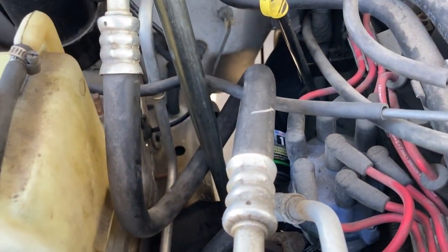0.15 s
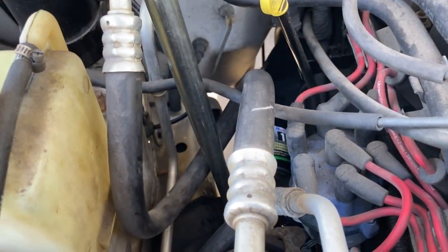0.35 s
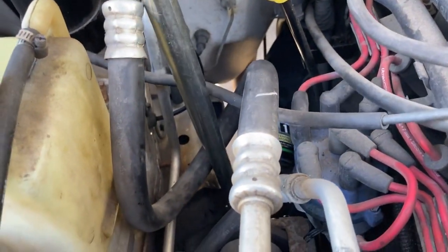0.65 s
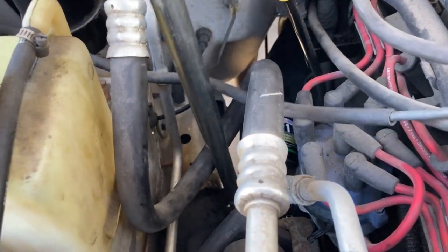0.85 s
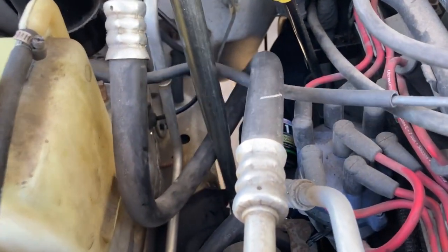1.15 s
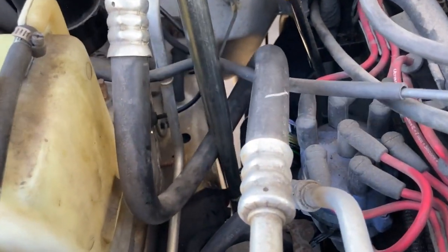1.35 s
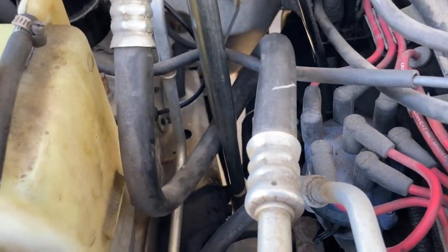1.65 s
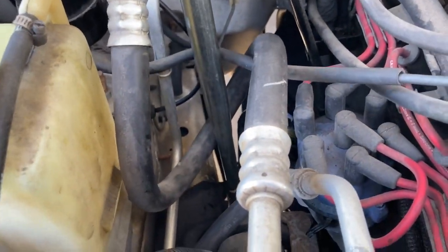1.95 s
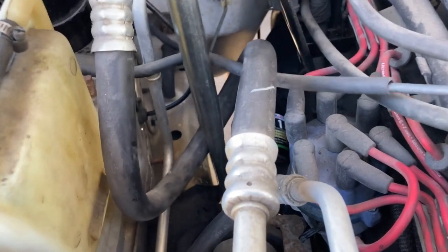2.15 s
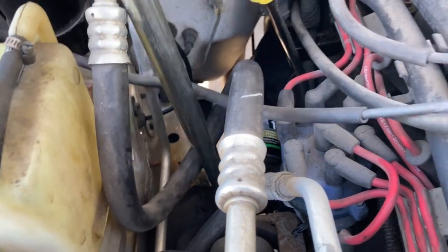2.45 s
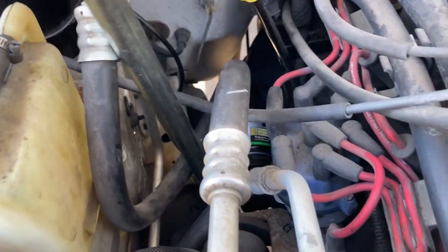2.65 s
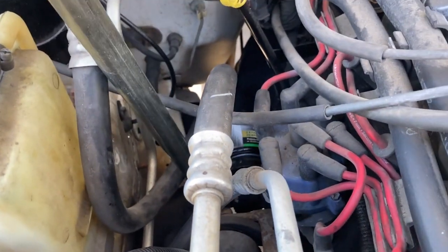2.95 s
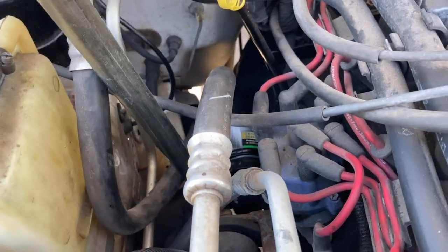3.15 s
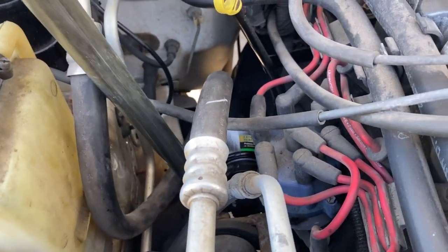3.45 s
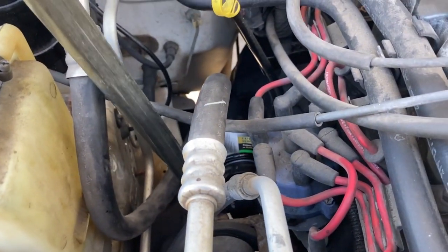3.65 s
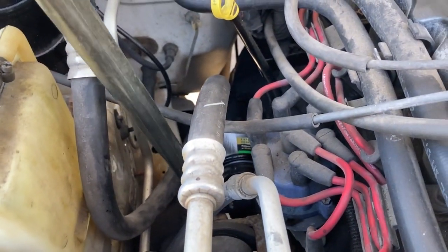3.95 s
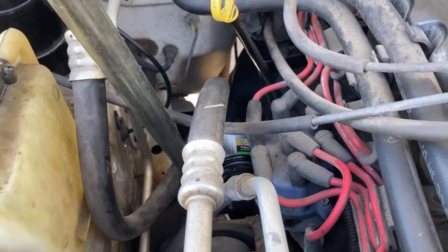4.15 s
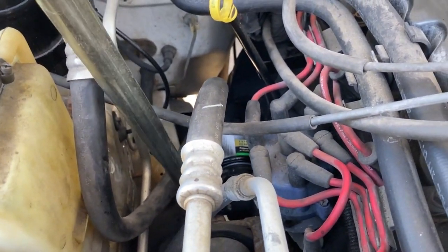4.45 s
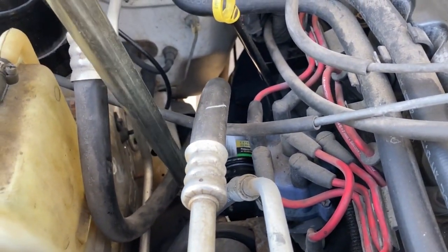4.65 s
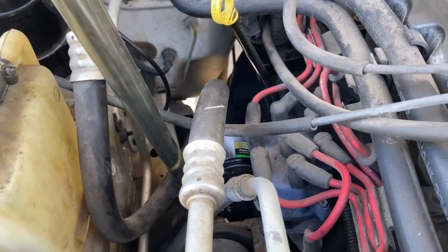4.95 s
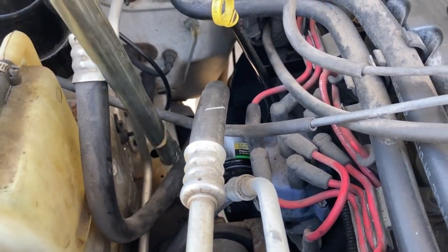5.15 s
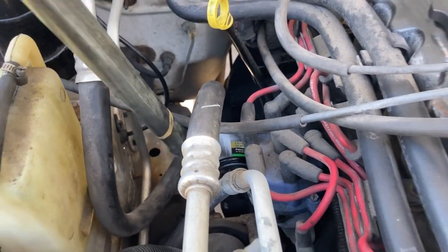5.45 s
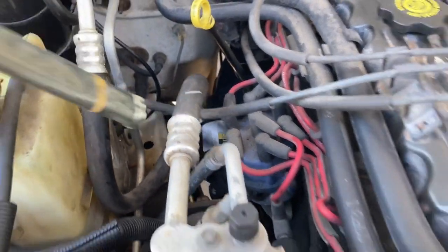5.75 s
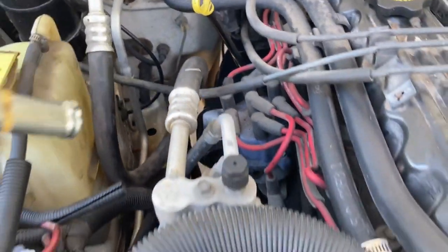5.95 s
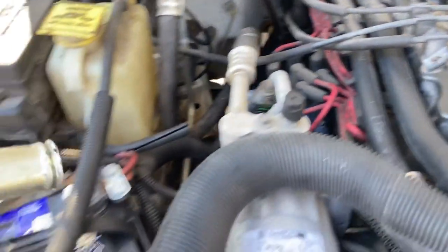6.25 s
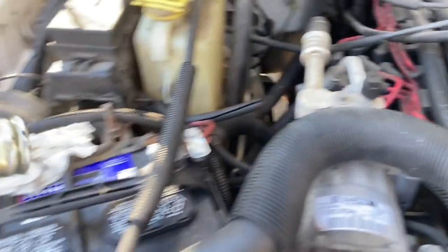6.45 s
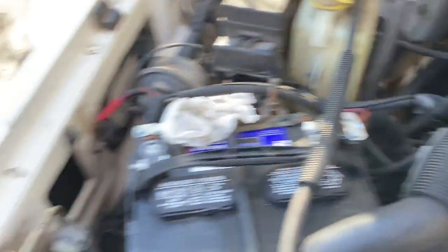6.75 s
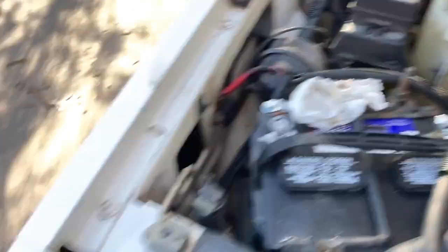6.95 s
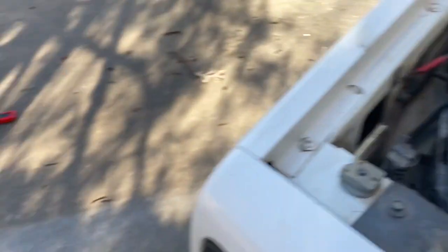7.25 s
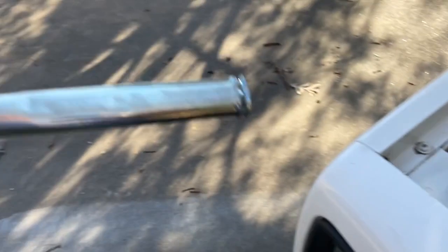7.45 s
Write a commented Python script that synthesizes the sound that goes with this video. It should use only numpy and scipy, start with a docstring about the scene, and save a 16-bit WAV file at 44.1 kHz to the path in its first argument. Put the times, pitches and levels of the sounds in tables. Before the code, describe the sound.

Close, outdoors at an open engine bay, with faint traffic, thin air hiss and uneven low wind rumble throughout. From 0.4 to 0.95 s a few small dull metal knocks sound with barely audible rubbing; then mostly wind, with a faint tick near 1.5. At 2.5 to 2.95 a quick cluster of sharp, dry clacks rattles out, running into gritty steel scraping that rises and falls through 4.3, with bumping gusts. Light clicks at 4.35 and 4.8 lead to the loudest moment: hard bright clanks at 5.1 and 5.2, with heavy short thuds, then more at 5.3 and 5.43. From 5.6 to 6.2 light ticks and a fine hissing slide set a hollow pipe ringing, high, glassy and fluttering, fading by about 7. Stronger wind thumps from 6.3 to 7.3 with faint clicks near 7.0 and 7.3, and a slight scrape at 7.5.

```python
"""Pipe extension on a wrench

A steel pipe extends a wrench deep in a car's engine bay, outdoors. The levered wrench knocks (noise bursts, struck
modes); the pipe scrapes up its handle (rubbing noise through handle modes), clanks off and rings as it is drawn out
(fluttering decaying tones). Wind buffets two microphone ports (low noise) over a faint street (steady noise)."""
import sys
import numpy as np
from scipy import signal
from scipy.fft import rfft, irfft, next_fast_len
from scipy.io import wavfile
from scipy.ndimage import uniform_filter1d

SR = 44100
rng = np.random.default_rng(int(sys.argv[2]) if len(sys.argv) > 2 else 0)


def transcribe(signal):
    """Save signal, clipped to [-1, 1], as a 16-bit WAV file at the path in sys.argv[1]."""
    frames = np.atleast_2d(signal).T
    limited = np.clip(frames, -1, 1)
    pcm = np.round(limited * 32767).astype(np.int16)
    wavfile.write(sys.argv[1], SR, pcm)


N = 335153

# Levels are in decibels; some functions add a fixed offset.
# street: start_s, traffic_db, air_db
STREET_LEVELS = [(0, -53.5, -71), (1.2, -52.5, -70), (2.3, -53, -68), (3.3, -56.5, -65), (5.0, -58.5, -68),
                 (6.2, -57.5, -66.5), (6.7, -62.5, -62), (7.6, -56.5, -59.5)]
# traffic and air spectra: freq_hz, density_db
TRAFFIC_COLOUR = [(88, -31), (150, 4), (230, -7), (409, -3), (482, -4.5), (617, -16.5), (945, -17),
                  (1070, -17), (2010, -32.5), (4000, -53), (5200, -71), (8800, -120)]
AIR_COLOUR = [(900, 2), (1300, 9.5), (1700, 1.5), (3300, 4), (5500, -5.5), (7500, -4), (10800, -8),
              (12000, -35), (15500, -22)]
# breeze that never quite drops: start_s, level_db
BREEZE_LEVELS = [(0, -49), (.7, -44.5), (.92, -37.5), (1.2, -45.5), (1.8, -38.5), (2.1, -46), (2.9, -42),
                 (4.4, -41.5), (4.85, -45.5), (5.4, -41.5), (5.75, -46), (6.2, -40.5), (6.5, -38),
                 (6.8, -36), (7.2, -34.5), (7.6, -50)]
# gusts on the ports: start_s, length_s, rumble_db, buffet_db, left_right_db
WIND_GUSTS = [(0.204, 0.065, -38.5, -71, 5), (1.361, 0.073, -28, -38, 7), (1.755, 0.092, -37, -38.5, -5),
              (2.178, 0.022, -36, -71, 13), (2.676, 0.053, -31, -39, -2.5), (2.796, 0.046, -30.5, -57, 1),
              (2.942, 0.038, -32.5, -39, 9), (3.013, 0.022, -21, -35, 5), (3.322, 0.048, -37.5, -49, 1),
              (3.426, 0.043, -29, -31.5, 1), (3.531, 0.033, -25.5, -46, 5), (3.633, 0.043, -32, -64, 9),
              (3.819, 0.083, -32, -44.5, 1.5), (3.962, 0.024, -22.5, -39, 6),
              (4.139, 0.047, -33, -34.5, 4.5), (4.474, 0.021, -42, -27.5, -4), (4.519, 0.049, -32, -34, -5),
              (4.656, 0.078, -37, -45.5, 0), (4.924, 0.021, -25.5, -33.5, -3), (4.985, 0.023, -31, -39, 8),
              (5.119, 0.029, -33, -32.5, -13.5), (5.2, 0.017, -31, -56, -11),
              (5.461, 0.033, -26.5, -32, -10.5), (6.302, 0.075, -30, -32.5, -1),
              (6.383, 0.088, -24.5, -36.5, 0), (6.453, 0.089, -26.5, -34.5, 0),
              (6.56, 0.036, -30, -44.5, 9), (6.663, 0.037, -34, -33, 0.5), (6.89, 0.063, -41, -44.5, 2),
              (6.986, 0.021, -20, -23.5, -0.5), (7.143, 0.024, -33, -29.5, 5), (7.239, 0.12, -36, -40, 1.5)]
# rumble and sharp buffet spectra: freq_hz, density_db
RUMBLE_COLOUR = [(20, -24), (35, -8), (52, 5), (75, 5), (120, -1.5), (180, -12.5), (300, -23.5), (600, -72)]
SHARP_BUFFET_COLOUR = [(25, -13.5), (60, -8), (130, -0.5), (220, -3), (350, -18.5), (600, -32.5),
                       (1200, -68)]
# left port against right: freq_hz, left_lead_rad
PORT_LEADS = [(20, 5), (300, -1.0), (600, -3), (1000, -1), (1450, -3), (1700, -2.24), (2150, -1.24),
              (3000, -2), (4200, -2), (5150, -3), (5950, -2.5), (8500, -0.5), (10000, 1.5), (13000, 4.5),
              (15000, -3.5)]
# likeness of near noise at the two ports: freq_hz, correlation_0_to_1
PORT_LIKENESS = [(100, 0.34), (400, 0.79), (1200, 0.79), (2100, 1), (4000, 0.97), (9000, 1), (15000, 1)]
# pipe strokes along the handle: start_s, length_s, rasp_db, hiss_db, growth_db
PIPE_STROKES = [(0.395, 0.39, -81.5, -79.5, -4), (0.994, 0.077, -77.5, -75, 1),
                (2.243, 0.13, -88, -70.5, -7), (2.461, 0.16, -67.5, -68, -3), (2.695, 0.052, -58.5, -68, 4),
                (2.762, 0.057, -61, -59, 0.5), (2.826, 0.068, -66.5, -52.5, -5),
                (2.969, 0.22, -75.5, -60.5, 10), (3.454, .19, -56, -63, 2.5),
                (3.654, 0.28, -57.5, -60.5, 9.5), (3.863, .19, -58.5, -59.5, 0),
                (4.306, 0.057, -59.5, -84, 9), (4.584, 0.22, -69, -67.5, 15.5),
                (4.8, 0.13, -57.5, -56.5, 3), (5.067, 0.07, -55, -74, 3.5),
                (5.213, 0.047, -56.5, -56.5, -1.5), (5.282, 0.029, -51, -63, 2.5),
                (5.615, 0.11, -64, -59, -16.5), (5.784, 0.44, -76.5, -56.5, 0.5),
                (6.187, 0.23, -68, -68.5, 7), (7.529, 0.035, -66.5, -70, -2)]
# sliding spectra: freq_hz, density_db
RASP_COLOUR = [(500, -25), (950, -23.5), (1150, -12), (2300, -18), (3300, -21), (4300, -13.5),
               (5500, -28.5), (9000, -40.5)]
HISS_COLOUR = [(4500, -16.5), (7000, -11.5), (10200, -3.5), (11200, -10), (12000, -15), (13200, -9),
               (15800, -19.5)]
# where the pipe's rim bears on the handle: start_s, place_0_to_1
RIM_PLACES = [(2.5, 0.71), (3.45, 0.03), (4.08, 0.47), (4.3, 0.7), (4.9, 1)]
# handle resonances: freq_hz, width_hz, level_db, best_place_0_to_1, loss_away_db
HANDLE_RESONANCES = [(1140, 95, -7.5, 0.79, 4), (1480, 210, -0.5, 0.78, 20), (1813, 97, 0.5, 0.89, 9.5),
                     (1990, 33, -4, 0.11, 10), (2702, 54, 2.5, 0.26, 3.8), (2958, 49, 1.5, 0.24, 3.6),
                     (3320, 45, 1, .37, 10), (3760, 160, 2, 0.68, 6.2), (3906, 150, -5, .35, 4),
                     (4220, 120, -9, .52, 11), (4880, 370, -8, 1, 9.2), (5040, 58, -1.5, .32, 14),
                     (5620, 81, -13, 0.33, 7), (6300, 67, -10, .35, 19), (7860, 120, -16.5, .7, 3)]
# wrench and pipe knocks: start_s, tick_db, thud_db, clang_db, clack_db
METAL_KNOCKS = [(0.394, -52, -50, -58.5, -78), (0.5053, -37, -36.5, -41.5, -44),
                (0.5835, -48.5, -47.5, -57, -56), (0.649, -75, -42.5, -51, -79),
                (0.6922, -38, -33.5, -40.5, -38.5), (0.875, -47.5, -39.5, -55, -53),
                (0.9291, -44.5, -38, -42, -43), (1.531, -51, -79, -63, -57.5),
                (2.4971, -26, -28, -36, -33.5), (2.523, -17, -29.5, -29, -26),
                (2.567, -31.5, -45, -45, -31), (2.61, -34, -32.5, -37.5, -38.5),
                (2.6518, -48, -39.5, -39.5, -50), (2.7248, -33.5, -47.5, -47.5, -29),
                (2.7426, -51, -32.5, -38, -61), (2.806, -46, -64, -52, -42),
                (2.821, -23, -43.5, -47.5, -44), (2.846, -38, -59, -59, -59),
                (2.9409, -37.5, -35, -43, -40.5), (3.1294, -46, -48.5, -47.5, -49),
                (4.3373, -37, -45, -39, -32), (4.352, -35, -52, -68.5, -29.5), (4.483, -73, -46, -59, -69),
                (4.8177, -40.5, -73, -45, -36), (4.875, -40, -70.5, -50.5, -42.5),
                (5.0943, -27, -51, -37, -27), (5.1036, -5.5, -34.5, -23, -16),
                (5.1919, -21, -18, -18.5, -21.5), (5.3106, -29, -37.5, -36, -23.5),
                (5.318, -41.5, -41, -38.5, -28.5), (5.3342, -35.5, -26, -30.5, -27),
                (5.4346, -13, -33.5, -37.5, -28), (5.463, -60, -36.5, -37.5, -50),
                (5.6329, -27.5, -51.5, -35, -28), (5.6533, -25.5, -56.5, -45, -41.5),
                (5.7857, -40.5, -55, -51, -60), (5.9114, -29.5, -69, -47.5, -40.5),
                (5.9435, -27, -59, -57.5, -41.5), (5.9746, -22, -55.5, -54, -39),
                (6.0444, -42, -53, -63, -54), (6.117, -34, -56, -78, -66), (6.327, -59, -46.5, -50, -48),
                (6.3949, -65, -48, -43, -42), (7.018, -44.5, -74, -44.5, -44),
                (7.2613, -38.5, -53.5, -39, -45), (7.3022, -58, -46.5, -46.5, -59)]
# ringing of tick, thud, clang, clack: level_db, rise_s, t60_s, tail_db
KNOCK_DECAYS = [(-2.5, 0.0011, 0.033, -29), (5, 0.0061, 0.093, -19.5), (2.5, 0.0014, 0.063, -11),
                (5, 0.0046, 0.043, -28)]
# spectra of tick, thud, clang, clack: freq_hz, density_db
KNOCK_COLOURS = [
    [(2500, -32.5), (5500, -2), (7000, -1), (10300, -4), (11200, -3), (12000, -19), (13500, -9),
     (15800, -15.5)],
    [(60, -27.5), (160, -5.5), (260, -9.5), (350, 5.5), (480, -11), (580, -18), (720, -8.5), (1500, -48.5)],
    [(300, -31.5), (560, -1.5), (700, -4.5), (880, 0.5), (1130, -1), (1400, 3), (1680, 0), (2000, -9.5),
     (3500, -39)],
    [(1000, -36.5), (2000, -5.5), (2500, 3.5), (3000, -0.5), (3400, -7), (4600, 0), (5600, -10.5),
     (8000, -17.5), (12000, -46.5)],
]
# hard clanks on heavy parts: start_s, bracket_db, plate_db, socket_db, bar_db
HARD_CLANKS = [(5.104, -30, -28, -24, -33.5), (5.193, -16.5, -15.5, 0, -6.5),
               (5.207, -26, -23.5, -14.5, -22.5), (5.336, -23.5, -35, -15, -31),
               (5.434, -42, -28.5, -42, -15)]
# engine thud modes: freq_hz, level_db, t60_s, left_right_db, left_lead_rad
ENGINE_THUD_MODES = [(325, -3, .12, 4, -.8), (377, 2.5, .2, 5, -.9), (570, -12, .11, 0, -2.2)]
# bracket, plate, socket, bar modes: freq_hz, level_db, t60_s, left_right_db, left_lead_rad
HEAVY_PART_MODES = [
    [(570, -4, .1, 0, -2.2), (856, 0, .15, 4, 1.9), (1707, 2, .12, -1, .7), (2245, -14, .17, 0, -1),
     (2363, -4, .08, -2.5, -1.4)],
    [(958, -10, .4, -1.5, -1.3), (1082, 0, .2, .5, -1.5), (1181, -4, .28, 4, .5)],
    [(1540, 0, .08, .5, -3.1), (2740, -19, .12, 0, -2)],
    [(1643, 0, .1, -2.5, -.2), (3327, -11, .07, -2.5, 3.1)],
]
# pipe modes by family (bending, low, middle, high ovalling, wall, upper wall, rim):
# freq_hz, level_db, t60_s, touch_loss_db
PIPE_MODE_FAMILIES = [
    [(994, -10, 1.1, 0), (2120, -2, .9, 0), (3672, -13, .9, 0)],
    [(2972, 0, .8, 0)],
    [(5934, 0, .75, 4)],
    [(6083, 0, .7, 4)],
    [(10018, 0, .55, 1), (11364, -18, 1.1, 1)],
    [(13028, 0, .95, 0)],
    [(14573, -10, .38, 1), (15027, 0, .38, 2)],
]
# touches that ring the pipe: start_s, bending_db, low_ovalling_db, middle_ovalling_db, high_ovalling_db,
# wall_db, upper_wall_db, rim_db
PIPE_TOUCHES = [(5.104, -57, -47, -42.5, -55.5, -38.5, -49, -43.5),
                (5.198, -42, -44, -54, -43.5, -34.5, -64, -47),
                (5.440, -45, -54.5, -44.5, -57, -51, -60.5, -68),
                (5.646, -36.5, -31, -27, -43, -35.5, -58, -35),
                (5.794, -47.5, -63, -43, -52, -30, -71, -39),
                (5.914, -43.5, -74, -38.5, -33, -36.5, -51.5, -46),
                (5.950, -63, -72, -50, -30, -28, -48.5, -43.5),
                (5.98, -71, -72.5, -36, -47.5, -28.5, -33, -40.5),
                (6.051, -49, -47, -34, -51, -35, -45.5, -49.5), (6.115, -66, -53, -55, -49, -38, -61, -40),
                (6.225, -75, -75, -40.5, -54, -43.5, -63, -63)]
# low tones fade while the swinging pipe points at the microphone, swell side-on: start_s, level_db
PIPE_AIM = [(5.16, -3), (5.25, 1), (5.33, -5), (5.41, 3.5), (5.5, 1), (5.56, -0.5), (5.70, -1), (5.90, 3),
            (6.01, -1.5), (6.07, -3.5), (6.18, 1), (6.30, -9)]
# closing hand chokes the bending tones: start_s, end_s, mode_hz, loss_db
HAND_CHOKES = [(5.915, 5.95, 2120, 17), (5.965, 6.0, 994, 14)]

BREEZE_FLUTTER_DB, BREEZE_FLUTTER_HZ = 0.5, 21
GUST_ATTACK_S, GUST_RELEASE_T60_S = 0.011, 0.12
STROKE_ATTACK_S, STROKE_RELEASE_T60_S = 0.037, 0.14
PIPE_RISE_S = 0.0033  # a touch is a brief chatter
CUTOFF_HZ = 15900
FFT_SIZE = next_fast_len(N, True)
TIME_S = np.arange(N) / SR
FREQ_HZ = np.maximum(np.fft.rfftfreq(FFT_SIZE, 1 / SR), 1)


def from_db(db):
    """Decibels to gain."""
    return 10 ** (np.asarray(db) / 20)


def rms_one(x):
    """Scale to an rms of 1."""
    return x / np.sqrt(np.mean(x ** 2) + 1e-20)


def in_time(rows):
    """Interpolate each column of a curve at every sample."""
    times_s, *columns = np.transpose(rows)
    return [np.interp(TIME_S, times_s, column) for column in columns]


def over_hz(points):
    """Interpolate a spectrum over log frequency."""
    freq_hz, value = np.transpose(points)
    return np.interp(np.log(FREQ_HZ), np.log(freq_hz), value)


def filtered(x, response):
    """Apply a frequency response."""
    return irfft(rfft(x, FFT_SIZE) * response, FFT_SIZE)[..., :N]


def add(track, start_s, piece):
    """Add a piece to a track from a given time."""
    at = int(start_s * SR)
    track[..., at:at + piece.shape[-1]] += piece[..., :N - at]


def drift(rate_hz):
    """Random control signal of rms 1: noise through two equal poles, computed every 40 samples."""
    pole = np.exp(-80 * np.pi * rate_hz / SR)
    white = rng.standard_normal(N // 40 + 2002)
    slow = signal.lfilter([1], [1, -2 * pole, pole * pole], white)[2000:]  # drop the settling
    return np.interp(np.arange(N) / 40, np.arange(len(slow)), rms_one(slow))


def noise(response):
    """Coloured noise of rms 1, unrelated at the two ports."""
    return rms_one(filtered(rng.standard_normal((2, N)), response))


def near_noise(response):
    """Close coloured noise of rms 1; mid and side shares set its likeness at the ports."""
    alike = np.clip(over_hz(PORT_LIKENESS), 0, 1)
    mid, side = noise(response * np.sqrt([1 + alike, 1 - alike]))
    return np.array([mid + side, mid - side]) / np.sqrt(2)


def swell(length_s, attack_s, release_t60_s, growth_db=0):
    """One second of a gesture's gain: sets in, holds or changes by growth_db, then dies away."""
    t = TIME_S[:SR]
    held_db = growth_db * (np.minimum(t / length_s, 1) - .5)
    released_db = -60 * np.maximum(t - length_s, 0) / release_t60_s
    return np.minimum(t / attack_s, 1) * from_db(held_db + released_db)


def envelope(times_s, levels_db, rise_s, t60_s):
    """Blows add their energy, which decays; a lag smooths the resulting gain."""
    energy = np.zeros(N)
    energy[(np.asarray(times_s) * SR).astype(int)] = from_db(levels_db) ** 2
    keep = from_db(-120 / (t60_s * SR))  # energy loses twice the amplitude's dB
    lag = np.exp(-1 / (rise_s * SR))
    gain = np.sqrt(signal.lfilter([1], [1, -keep], energy + 1e-22))
    return signal.lfilter([1 - lag], [1, -lag], gain)


def crowded_modes(spacing_hz):
    """Countless small resonances ripple a metal part's response, fully above 1700 Hz."""
    centres_hz = np.arange(0, SR / 2, spacing_hz)
    ripple = np.interp(FREQ_HZ, centres_hz, rng.uniform(-1, 1, 1000)[:len(centres_hz)])
    return from_db(9 * ripple * np.minimum(FREQ_HZ / 1700, 1))


def wandering(x, share, rate_hz):
    """Uneven playback speed slides all resonances up and down together."""
    return np.interp(np.cumsum(1 + share * drift(rate_hz)), np.arange(N), x, right=0)


def street():
    """Far traffic and a thin outdoor hiss, as noise unrelated at the ports."""
    traffic_db, air_db = in_time(STREET_LEVELS)
    traffic = from_db(traffic_db) * noise(from_db(over_hz(TRAFFIC_COLOUR)))
    air = from_db(air_db) * noise(from_db(over_hz(AIR_COLOUR)))
    return traffic + air


def eddies(colour, span_s, opposed=0.1):
    """Evenly strong turbulence, pushing a little on one port while pulling at the other."""
    flow = noise(from_db(over_hz(colour)))
    flow = flow - opposed * flow[::-1]
    local_power = uniform_filter1d((flow ** 2).mean(0), int(span_s * SR))
    return flow / np.sqrt(local_power + 1e-6)


def wind():
    """Eddies rumble at the ports; gusts may favour one side, and their sharp buffets reach higher up."""
    breeze_db, = in_time(BREEZE_LEVELS)
    rumble_power, buffet_power = np.zeros((2, 2, N))
    rumble_power += from_db(breeze_db + BREEZE_FLUTTER_DB * drift(BREEZE_FLUTTER_HZ)) ** 2
    for start_s, length_s, rumble_db, buffet_db, pan_db in WIND_GUSTS:
        sides = rms_one(from_db([[pan_db / 2], [-pan_db / 2]]))
        gust = sides * swell(length_s, GUST_ATTACK_S, GUST_RELEASE_T60_S)
        add(rumble_power, start_s, (from_db(rumble_db) * gust) ** 2)
        add(buffet_power, start_s, (from_db(buffet_db) * gust) ** 2)
    rumble = np.sqrt(rumble_power) * eddies(RUMBLE_COLOUR, span_s=0.032)
    buffets = np.sqrt(buffet_power) * eddies(SHARP_BUFFET_COLOUR, span_s=0.03)
    return rumble + buffets


def engine_bay(x, t60_s=0.071, wet_db=-15):
    """Bonnet and bodywork return a short scatter of echoes: decaying noise after 4 ms."""
    t = TIME_S[:SR // 2]
    echoes = rng.standard_normal((2, len(t))) * from_db(-60 * t / t60_s) * (t > .004)
    echoes /= np.sqrt((echoes ** 2).sum(1, keepdims=True))
    return x + from_db(wet_db) * signal.fftconvolve(x, echoes, axes=1)[:, :N]


def ports(x):
    """Near sounds reach the two ports out of step, by a phase that varies with frequency."""
    return filtered(x, np.exp(.5j * over_hz(PORT_LEADS) * np.array([[1], [-1]])))


def rasp(catch_db=4, reach=0.29, unrest_db=2.5):
    """Tiny uneven catches ring the handle; each mode speaks most as the rim passes its liveliest place."""
    place, = in_time(RIM_PLACES)
    catches = rms_one(rng.standard_normal(N) * from_db(catch_db * drift(200)))
    out = filtered(catches, from_db(over_hz(RASP_COLOUR)))
    for freq_hz, width_hz, level_db, best_place, loss_db in HANDLE_RESONANCES:
        away = 1 - np.exp(-((place - best_place) / reach) ** 2)
        push = catches * from_db(level_db - loss_db * away + unrest_db * drift(14))
        out = out + signal.lfilter(*signal.iirpeak(freq_hz, freq_hz / width_hz, fs=SR), push)
    return wandering(rms_one(out), share=.008, rate_hz=4)


def sliding(grain_db=0.0, pressure_db=2.0):
    """Steel rubs on steel: a rasp and a fine hiss under an unsteady hand."""
    rasp_power, hiss_power = np.zeros((2, N))
    for start_s, length_s, rasp_db, hiss_db, growth_db in PIPE_STROKES:
        stroke = swell(length_s, STROKE_ATTACK_S, STROKE_RELEASE_T60_S, growth_db)
        add(rasp_power, start_s, (from_db(rasp_db + 13) * stroke) ** 2)
        add(hiss_power, start_s, (from_db(hiss_db + 3.5) * stroke) ** 2)
    hiss = near_noise(from_db(over_hz(HISS_COLOUR)) * crowded_modes(spacing_hz=144.0))
    rubbing = np.sqrt(rasp_power) * rasp() + np.sqrt(hiss_power) * hiss
    return rubbing * from_db(grain_db * drift(120) + pressure_db * drift(13))


def handle_colour(leak):
    """The handle's resonances at mean strength, over the share of sound that bypasses them."""
    response = leak
    for freq_hz, width_hz, level_db, _, loss_db in HANDLE_RESONANCES:
        detuning = 2 * (FREQ_HZ - freq_hz) / width_hz
        response = response + from_db(level_db - loss_db / 2) / (1 + detuning ** 2)
    return response


def knocks(tail_t60_s=0.2):
    """A hard tick builds first; the handle's clack and the rattle of parts behind it build at their own rates."""
    times_s, *parts_db = np.transpose(METAL_KNOCKS)
    metal = handle_colour(leak=0.53) * crowded_modes(spacing_hz=128.44)
    out = 0
    for part_db, colour, (level_db, rise_s, t60_s, tail_db) in zip(parts_db, KNOCK_COLOURS, KNOCK_DECAYS):
        decay = envelope(times_s, part_db + level_db, rise_s, t60_s)
        tail = envelope(times_s, part_db + level_db + tail_db, rise_s, tail_t60_s)
        out = out + near_noise(from_db(over_hz(colour)) * metal) * (decay + tail)
    return out


def struck(times_s, levels_db, modes, rise_s, spread_db):
    """Each blow rings every mode at a random phase, its strength varied by spread_db; modes may favour a port."""
    out, t = np.zeros((2, N)), TIME_S[:SR // 2]
    side = np.array([[.5], [-.5]])
    for freq_hz, mode_db, t60_s, pan_db, lead_rad in modes:
        decay = from_db(mode_db + side * pan_db - 60 * t / t60_s) * (1 - np.exp(-t / rise_s))
        for start_s, blow_db in zip(times_s, levels_db):
            strength = from_db(blow_db + spread_db * rng.standard_normal())
            tone = np.sin(2 * np.pi * (freq_hz * t + rng.random()) + side * lead_rad)
            add(out, start_s, strength * decay * tone)
    return out


def heavy_parts(thud_db=-4):
    """Every knock thuds in the engine parts; hard clanks also shake clear tones out of heavy parts."""
    times_s, _, knock_db, _, _ = np.transpose(METAL_KNOCKS)
    out = struck(times_s, knock_db + thud_db, ENGINE_THUD_MODES, rise_s=0.0038, spread_db=1.2)
    times_s, *parts_db = np.transpose(HARD_CLANKS)
    for part_db, modes in zip(parts_db, HEAVY_PART_MODES):
        out += struck(times_s, part_db, modes, rise_s=0.0039, spread_db=0.0)
    return out


def choke_loss_db(freq_hz):
    """The closing hand's growing loss on one mode."""
    return sum(np.interp(TIME_S, [start_s, end_s], [0, loss_db])
               for start_s, end_s, mode_hz, loss_db in HAND_CHOKES if mode_hz == freq_hz)


def pipe(flutter_hz=15.6, port_spread_rad=0.44, partner=0.7):
    """Modes ring on, touches damping some; each tone is a split pair on a not quite round pipe, so it beats and
    flutters."""
    times_s, *families_db = np.transpose(PIPE_TOUCHES)
    touches_so_far = uniform_filter1d(np.searchsorted(times_s, TIME_S).astype(float), SR // 200)
    touch_numbers = 1 + np.arange(len(times_s))
    aim_curve_db, = in_time(PIPE_AIM)
    port_offset_rad = port_spread_rad * drift(3.3) * np.array([[1], [-1]])
    out = np.zeros((2, N))
    for touch_db, modes in zip(families_db, PIPE_MODE_FAMILIES):
        for freq_hz, level_db, t60_s, touch_loss_db in modes:
            aim_db, offset_rad = (aim_curve_db, port_offset_rad) if freq_hz < 4000 else (0, 0)
            # motion shifts the high tones most
            angle = 2 * np.pi * freq_hz * TIME_S + freq_hz / 10000 * drift(12)
            # phase of the split partner tone
            partner_phase = 2 * np.pi * flutter_hz * TIME_S + 2.72 * drift(4.97)
            tone = np.sin(angle) + partner * np.sin(angle + partner_phase + offset_rad)
            # pre-boosted by touch number: a touch damps only what rang before it
            ring = envelope(times_s, touch_db + level_db + touch_loss_db * touch_numbers, PIPE_RISE_S, t60_s)
            loss_db = choke_loss_db(freq_hz) + touch_loss_db * touches_so_far
            out += tone * ring * from_db(aim_db - loss_db)
    return from_db(8.0) * out


def scene():
    """Street and wind around the metal sounds; the bay echoes the knocks, sliding and heavy parts."""
    metal = engine_bay(ports(knocks() + sliding()) + heavy_parts())
    return street() + wind() + metal + ports(pipe())


def record(dry):
    """The highest peaks are rounded and the top is cut steeply."""
    rounded = dry / (1 + (dry / .85) ** 6) ** (1 / 6)
    return signal.sosfilt(signal.ellip(12, .1, 90, CUTOFF_HZ, fs=SR, output="sos"), rounded)


dry = scene()
out = record(dry)
transcribe(out)
```